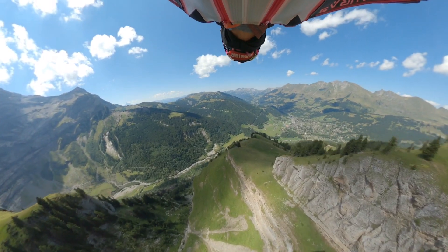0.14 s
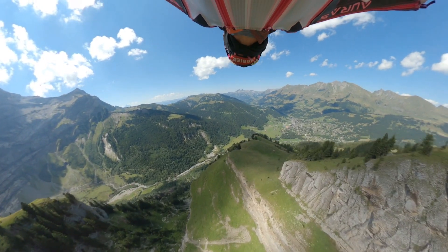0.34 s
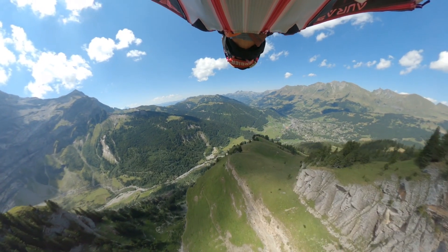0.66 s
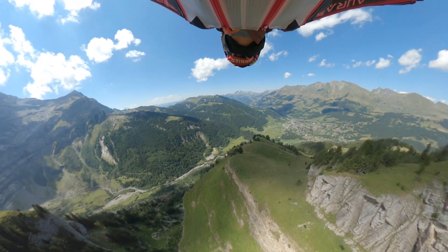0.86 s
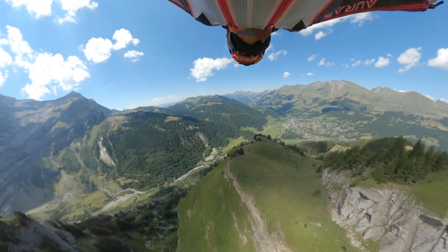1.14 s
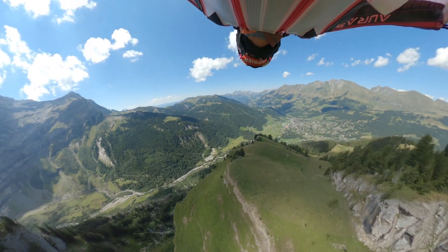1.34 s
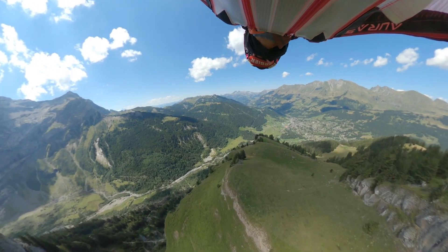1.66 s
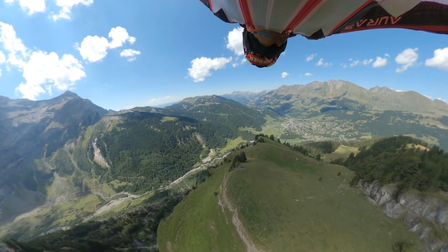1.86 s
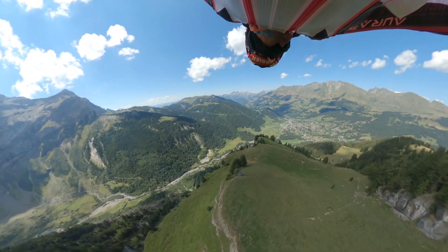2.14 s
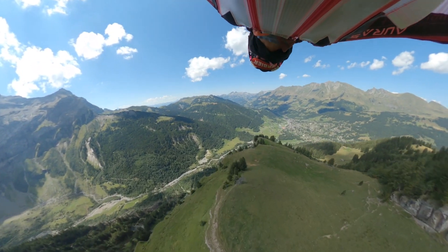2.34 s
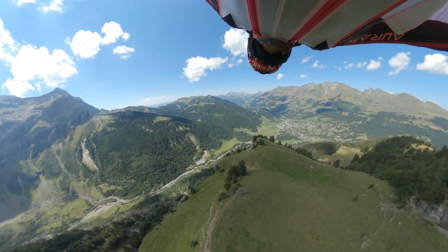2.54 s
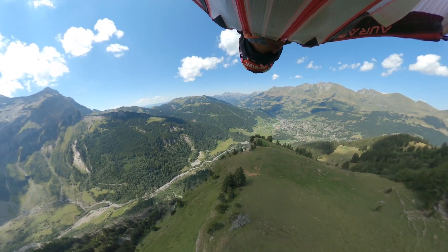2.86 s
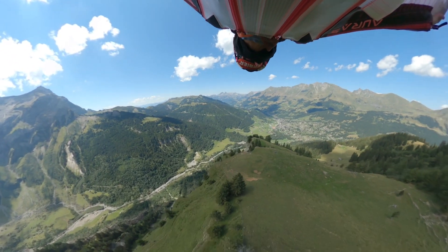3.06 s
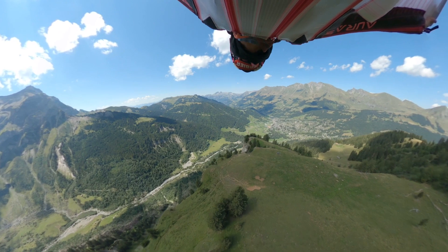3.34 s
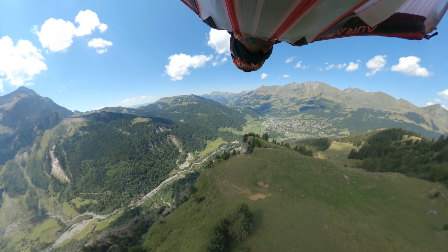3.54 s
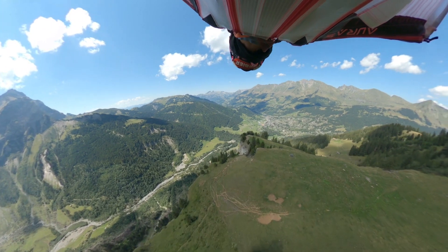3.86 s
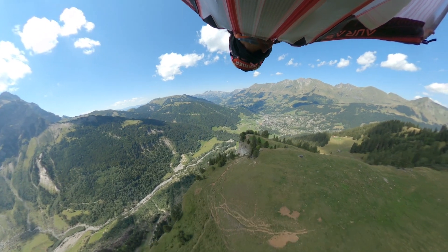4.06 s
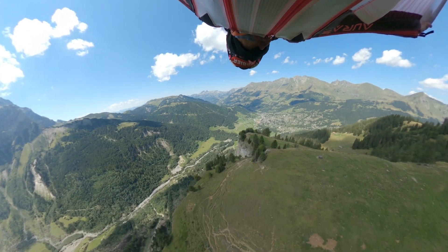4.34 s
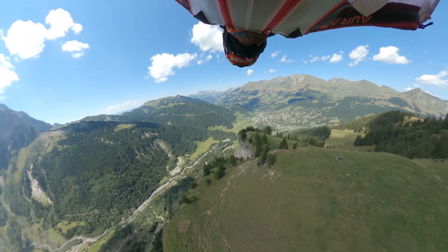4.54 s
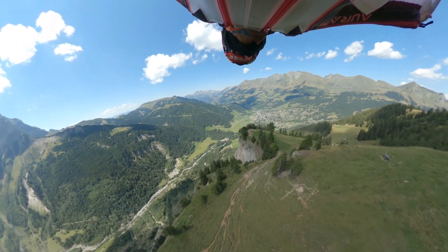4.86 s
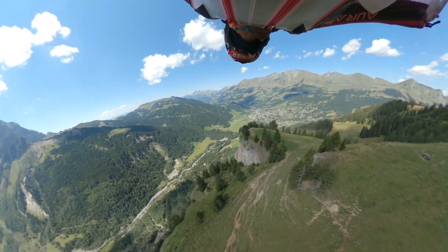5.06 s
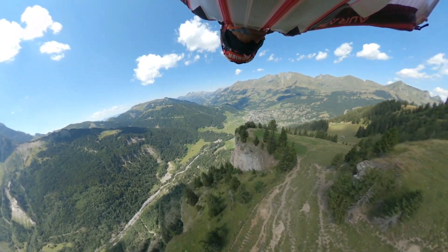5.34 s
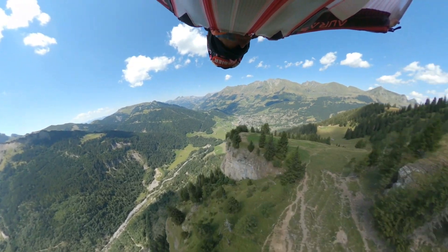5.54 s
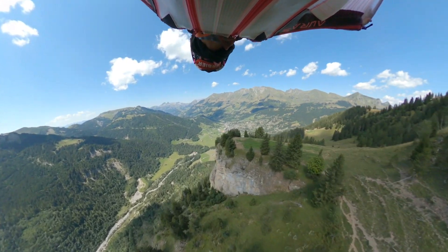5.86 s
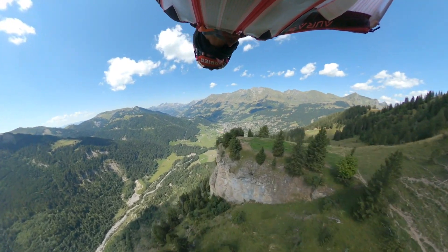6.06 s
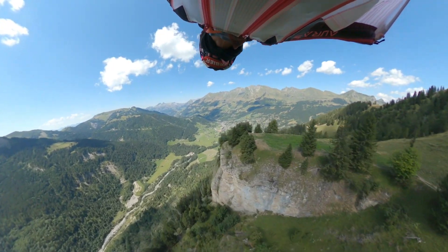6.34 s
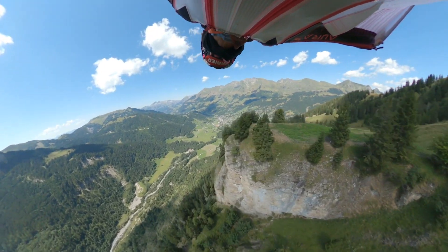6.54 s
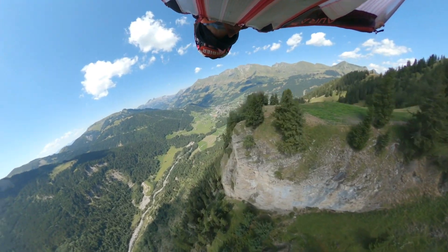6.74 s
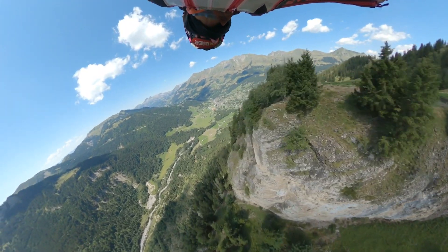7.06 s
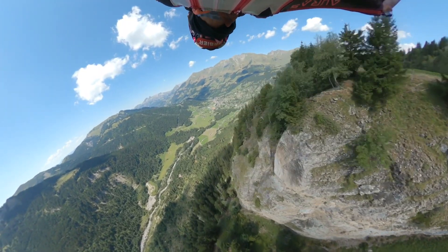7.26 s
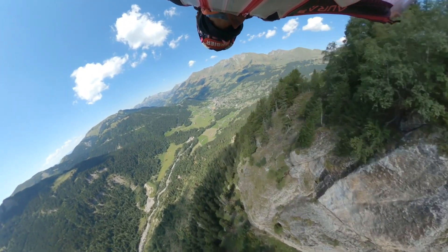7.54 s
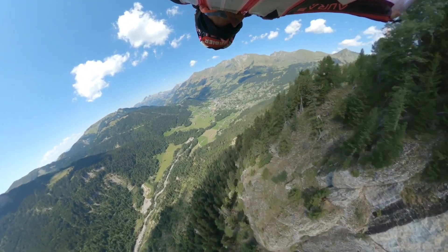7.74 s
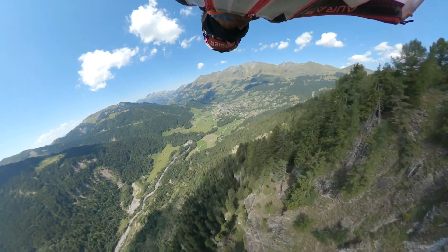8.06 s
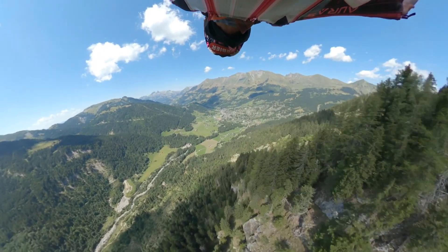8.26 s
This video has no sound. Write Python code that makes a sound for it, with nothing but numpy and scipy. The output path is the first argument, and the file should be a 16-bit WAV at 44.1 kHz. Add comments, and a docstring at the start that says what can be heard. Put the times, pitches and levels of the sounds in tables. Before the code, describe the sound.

Fast wind roars and buffets against a microphone on a wingsuit flyer, with deep thumps, fluttering slaps and a steady hiss over mountain slopes.

```python
"""Open sky, in fast wingsuit flight: the airstream beats on a body-mounted camera and its one microphone.
Deep noise swells into thumps as large eddies hit the housing; band noise and a swooping tone make its wake.
Midrange noise puffs and tears in short slaps of rough air, and fine turbulence hisses in the microphone port.
A thin, very high noise sizzles once over a faint sheen; a limiter eases the peaks."""
import sys
import numpy as np
from scipy import signal
from scipy.fft import rfft, irfft
from scipy.io import wavfile
from scipy.ndimage import uniform_filter1d, minimum_filter1d

SR = 44100
rng = np.random.default_rng(int(sys.argv[2]) if len(sys.argv) > 2 else 0)


def log_audio(samples):
    """Write samples as a 16-bit WAV file to the path given in sys.argv[1]."""
    # one column per channel
    frames = np.atleast_2d(samples).T
    # limit to full scale, then quantise
    limited = np.clip(frames, -1, 1)
    pcm = np.round(limited * 32767).astype(np.int16)
    wavfile.write(sys.argv[1], SR, pcm)


N = 370440  # 8.4 s
TIME = np.arange(N) / SR
FREQS = np.maximum(np.fft.rfftfreq(N, 1 / SR), 1)  # kept above zero for the logarithm


def undb(db):
    """Decibels to gain."""
    return 10 ** (np.asarray(db) / 20)


def unit(x):
    """Scale to rms 1."""
    return x / np.sqrt(np.mean(x ** 2))


def curve(rows):
    """Join rows of (time_s, value) by straight lines."""
    return np.interp(TIME, *np.transpose(rows))


def colour(points):
    """Gain at each frequency from (freq_hz, level_db) points, joined over log frequency."""
    hz, db = np.transpose(points)
    return undb(np.interp(np.log(FREQS), np.log(hz), db))


def noise(gain):
    """Fresh noise of rms 1 with the given gain at each frequency."""
    spectrum = rfft(rng.standard_normal(N))
    return unit(irfft(spectrum * gain, N))


def walk(rate_hz):
    """Slow random drift of rms 1, changing up to about rate_hz times a second."""
    return noise(1 / (1 + (FREQS / rate_hz) ** 4))


def sustain(x, span_s):
    """Even out the power over span_s: a steady stream keeps feeding its eddies."""
    power = uniform_filter1d(x ** 2, max(int(span_s * SR), 2))
    return x / np.sqrt(power + 1e-9)


# Large eddies that thump the housing; the shortest stay below their level.
# Columns: middle_s, length_s, level_db
THUMPS = [(0.051, .14, -20.5), (0.382, 0.11, -20), (1.899, 0.24, -21), (2.119, 0.19, -23),
          (2.376, 0.13, -19), (2.773, .09, -24), (3.03, .08, -23), (3.394, 0.06, -24), (3.87, 0.15, -26.5),
          (4.24, 0.14, -23), (4.939, 0.082, -21.5), (5.398, 0.15, -16), (5.57, 0.077, -17.5),
          (5.762, .08, -17.5), (5.884, .08, -18.5), (6.113, .08, -25), (6.852, .1, -22), (7.038, .12, -22),
          (7.196, 0.08, -16), (7.387, 0.06, -20), (7.601, .08, -18.5), (8.001, .09, -23),
          (8.316, 0.067, -17.5)]
THUMP_EDGE_S = 0.079  # full rise or fall time


def thumps():
    """Summed power of the large eddies: each rises, holds if long enough, and falls."""
    power = np.zeros(N)
    for middle, length, db in THUMPS:
        inside_s = length / 2 - np.abs(TIME - middle)
        envelope = np.clip(inside_s / THUMP_EDGE_S + .5, 0, 1)
        power += (undb(db) * envelope) ** 2
    return power


# Deep tone balance of the rumble. Columns: freq_hz, level_db (relative)
BUFFET_COLOUR = [(10, -8), (22, -5), (37, -.5), (48, -2.5), (64, -1), (80, -6.5), (100, -9), (250, -35.5),
                 (800, -83.5), (8000, -130)]
RUMBLE_DB, REFERENCE_HISS_DB = -27.5, -34.5  # rumble between thumps when the stream is at this hiss level


def buffet(thump_power, lumps_db=2, slack_gain=0.88):
    """Large eddies press on the diaphragm: a lumpy rumble, heavier in thumps and where the stream slackens."""
    slack_db = REFERENCE_HISS_DB - curve(STREAM_LEVEL)
    steady = undb(RUMBLE_DB + slack_gain * slack_db + lumps_db * walk(34))
    rumble = sustain(noise(colour(BUFFET_COLOUR)), 0.055)
    return rumble * np.sqrt(steady ** 2 + thump_power)


# Strength of the wake behind the housing. Columns: time_s, level_db (before trim)
WAKE_STRENGTH = [(0.0, -17.5), (0.28, -16.5), (.42, -17), (0.56, -13), (.88, -16), (1.0, -15.5),
                 (1.1, -16.5), (1.36, -14), (1.47, -15.5), (1.57, -13), (1.69, -16), (1.92, -15),
                 (2.32, -17.5), (2.53, -13.5), (2.98, -13.5), (3.15, -15), (3.35, -14.5), (3.42, -17),
                 (3.52, -13.5), (3.73, -16.5), (3.87, -15), (4.03, -15), (4.13, -15.5), (4.38, -14.5),
                 (4.52, -17), (4.72, -13), (4.89, -19), (5.06, -13.5), (5.18, -18), (5.38, -16),
                 (5.82, -14), (6.11, -20.5), (6.26, -17.5), (6.58, -19.5), (7.02, -14.5), (7.14, -18.5),
                 (7.24, -17), (7.49, -14), (7.76, -15), (8.1, -16.5), (8.19, -15.5), (8.4, -19.5)]
# Rate at which vortices leave the housing, before random wander. Columns: time_s, pitch_hz
SHEDDING_PITCH = [(0, 125.9), (.32, 99.25), (.57, 128), (.7, 88), (.85, 106.9), (1.02, 134), (1.15, 97.7),
                  (1.3, 122.5), (1.48, 84), (1.6, 132.3), (1.77, 88), (1.9, 128), (2.38, 77.8),
                  (2.53, 109.7), (2.66, 106), (2.82, 160.4), (2.96, 79.2), (3.5, 131), (3.62, 84.6),
                  (3.84, 150.1), (4.16, 112), (4.28, 162.7), (4.45, 123.6), (4.7, 112.5), (4.86, 84.5),
                  (5.08, 92.2), (5.4, 125.1), (5.84, 108.8), (5.98, 145.8), (6.45, 86.1), (6.92, 96),
                  (7.1, 114.4), (7.35, 83.2), (7.53, 126.6), (7.76, 137.2), (7.92, 91.4), (8.4, 100)]
# Tone balance of the wake's turbulence. Columns: freq_hz, level_db (relative)
WAKE_COLOUR = [(35, -18.5), (76, -0.6), (110, 0), (135, 0.3), (165, -1.5), (215, -3.5), (255, -8.5),
               (300, -10.5), (450, -23.5), (1000, -36), (3000, -77), (10000, -120)]


def wake(slap_power, wander=.06, jitter=.12, swell_db=3, shed_db=-5.0, lock_gain=0.63,
         throb_db=1.0, stir_db=-1.5, trim_db=-2.0):
    """Vortices peel off at a swooping rate and stand out in a strong wake; slaps stir the wake up."""
    hz = curve(SHEDDING_PITCH) * np.exp(wander * walk(11.08) + jitter * walk(72.1))
    strength_db = curve(WAKE_STRENGTH)
    drone = np.sin(2 * np.pi * np.cumsum(hz) / SR)
    vortices = drone * undb(swell_db * walk(13) + lock_gain * strength_db)
    churn = noise(colour(WAKE_COLOUR)) + undb(shed_db) * unit(vortices)
    steady = undb(strength_db + trim_db + throb_db * walk(17))
    stirred_power = undb(stir_db) ** 2 * slap_power
    return sustain(churn, .08) * np.sqrt(steady ** 2 + stirred_power)


# Pockets of rough air that slap the port. Columns: start_s, length_s, level_db (before trim)
SLAPS = [(0.655, 0.045, -27.5), (0.828, 0.023, -24), (1.036, .06, -29.5), (1.265, 0.083, -28),
         (1.674, 0.071, -29), (1.835, .08, -26), (2.123, 0.046, -28), (2.354, 0.042, -25),
         (2.453, 0.021, -28.5), (2.506, 0.035, -28.5), (2.603, .028, -28), (2.782, 0.11, -28.5),
         (2.924, .037, -25), (3.231, 0.016, -21.5), (3.307, .06, -26.5), (3.473, 0.037, -24),
         (3.58, 0.065, -29), (4.371, .03, -25.5), (4.654, 0.051, -27.5), (4.964, .05, -30),
         (5.251, .045, -26.5), (5.346, .028, -21.5), (5.404, 0.074, -23.5), (5.538, 0.036, -23),
         (5.721, .041, -19.3), (5.829, 0.036, -20.5), (5.887, 0.039, -24.5), (6.021, .03, -25),
         (6.335, .062, -28.5), (6.706, 0.063, -28), (7.005, .062, -23), (7.085, .06, -21.5),
         (7.174, 0.058, -23), (7.254, 0.083, -30.5), (7.752, .04, -33.5), (7.803, 0.03, -28),
         (7.866, .027, -25.5), (8.03, 0.021, -26.5), (8.254, .038, -25.5)]
SLAP_ATTACK_S, SLAP_DECAY_S = .005, .009


def slaps():
    """Summed power of the pockets of rough air: each hits abruptly, holds and dies away."""
    power = np.zeros(N)
    for start, length, db in SLAPS:
        age = TIME - start
        attack = np.clip(age / SLAP_ATTACK_S, 0, 1)
        decay = np.exp(-np.maximum(age - length, 0) / SLAP_DECAY_S)
        power += (undb(db) * attack * decay) ** 2
    return power


# Level of the steady roar, which thins out in the lulls between slaps. Columns: time_s, level_db
ROAR_LEVEL = [(0.0, -29.5), (.2, -30), (1.1, -31), (1.5, -30), (2.25, -30.5), (2.9, -33.5), (3.16, -31.5),
              (3.4, -32.5), (3.75, -32.5), (4.0, -30), (4.72, -32), (4.9, -32), (5.15, -30), (5.45, -27.5),
              (5.62, -33), (5.85, -30), (6.15, -32), (6.55, -31), (6.95, -29.5), (7.12, -27.5),
              (7.5, -32.5), (8.4, -30.5)]
# Tone balance of the puffs. Columns: freq_hz, level_db (relative)
GUST_COLOUR = [(120, -21), (230, -2.5), (320, 1), (450, -1.5), (680, -7), (950, -21), (1500, -27.5),
               (4000, -63.5), (12000, -100)]
# Duller tone balance of the tears. Columns: freq_hz, level_db (relative)
SLAP_COLOUR = [(110, -10), (220, 4), (340, 1), (480, -4), (700, -14), (950, -25.5), (1500, -31),
               (4000, -67.5), (12000, -105)]


def gusts(slap_power, flutter_db=0.7, surge_db=1.1, slap_trim_db=-1.33):
    """Rough air breaks at the port in quick, uneven puffs; each slap adds a short, duller tear."""
    puffs = sustain(noise(colour(GUST_COLOUR)) * undb(flutter_db * walk(45)), .08)
    roar = puffs * undb(curve(ROAR_LEVEL) + surge_db * walk(37))
    tear = sustain(noise(colour(SLAP_COLOUR)), .025)
    return roar + tear * undb(slap_trim_db) * np.sqrt(slap_power)


# Speed of the smooth stream over the port, as its hiss level. Columns: time_s, level_db (before trim)
STREAM_LEVEL = [(0.0, -39), (0.36, -38), (1.08, -37.5), (1.26, -36.5), (1.55, -37), (2.1, -37.5),
                (2.48, -36.5), (2.75, -38), (3.55, -37.5), (4.5, -38.5), (5.35, -37.5), (6.0, -40),
                (6.36, -39.5), (6.6, -39.5), (7.28, -40.5), (7.47, -39), (7.8, -39.5), (8.0, -40),
                (8.25, -38.5), (8.4, -38)]
# Lift of the midrange rush over the rest of the hiss. Columns: time_s, lift_db
RUSH_LIFT = [(0.0, 1), (.75, -0.5), (1.05, -1), (1.5, -1), (1.85, .5), (2.08, -0.5), (2.7, .8), (3.1, -.5),
             (3.85, .6), (4.4, 0.7), (4.78, 2.3), (5.0, 0), (5.42, 0.7), (6.18, 0.3), (6.5, 1.5), (6.7, -1),
             (7.15, 2.5), (7.65, -1), (8.4, 1.5)]
# Tone balance of the hiss before the port's resonance. Columns: freq_hz, level_db (relative)
STREAM_COLOUR = [(300, -16.5), (800, 8), (1150, 4.5), (1550, 3), (2000, -0.7), (2600, -1.5), (3300, -4),
                 (4300, -6.5), (5200, -11), (6500, -19), (8000, -27), (9300, -34), (12300, -47),
                 (15000, -68.5)]


def stream(pressure, port_hz=4020, port_width_hz=450, port_db=3.0, bright_hz=4600, brighten=0.44,
           ripple_db=0.5, flicker_db=0.24, trim_db=0.43, rush_hz=1750):
    """Fine turbulence hisses through the port's resonance, brightens with speed and ripples with each eddy."""
    port = undb(port_db / (1 + (2 * (FREQS - port_hz) / port_width_hz) ** 2))
    hiss = noise(colour(STREAM_COLOUR) * port)
    speed_db = curve(STREAM_LEVEL)
    # split into fine treble, midrange rush and what lies between
    spectrum = rfft(hiss)
    fine = irfft(spectrum / (1 + (bright_hz / FREQS) ** 10), N)
    rush = irfft(spectrum / (1 + (FREQS / rush_hz) ** 10), N)
    middle = hiss - fine - rush
    # small eddies grow faster with speed than large ones; the rush swells on its own
    bright = fine * undb(brighten * (speed_db - speed_db.mean()))
    mix = middle + bright + rush * undb(curve(RUSH_LIFT))
    return mix * undb(speed_db + trim_db + ripple_db * unit(pressure) + flicker_db * walk(12))


# Very high tone balance of the sizzle. Columns: freq_hz, level_db (relative)
SIZZLE_COLOUR = [(10300, -52), (11100, -14), (11500, -4), (12100, 2), (12900, -5), (14000, -10),
                 (15700, -17)]
SIZZLE_START_S, SIZZLE_STOP_S = 6.062, 6.418
SIZZLE_ATTACK_S, SIZZLE_DECAY_S, SIZZLE_RELEASE_S = .003, 0.029, .008  # exponential time constants
SIZZLE_FLARE_DB, SIZZLE_HOLD_DB, SIZZLE_SWELL_DB_PER_S = -51, -74.5, 23
SIZZLE_LEAD_DB, SIZZLE_LEAD_S = -76, .25  # a faint sputter builds before the flare


def sizzle(grain_db=1.0, sputter_db=6):
    """A grainy hiss, perhaps air squeezing through a narrow gap: it sputters, flares, lingers and stops."""
    early = np.minimum(TIME - SIZZLE_START_S, 0)
    late = np.maximum(TIME - SIZZLE_STOP_S, 0)
    age = np.clip(TIME, SIZZLE_START_S, SIZZLE_STOP_S) - SIZZLE_START_S
    flare = undb(SIZZLE_FLARE_DB) * np.exp(-age / SIZZLE_DECAY_S)
    hold = undb(SIZZLE_HOLD_DB + SIZZLE_SWELL_DB_PER_S * age)
    flow = (flare + hold) * np.exp(early / SIZZLE_ATTACK_S)
    sputter = unit(undb(sputter_db * walk(110)))
    lead = undb(SIZZLE_LEAD_DB) * np.exp(early / SIZZLE_LEAD_S) * sputter
    envelope = np.maximum(lead, flow) * np.exp(-late / SIZZLE_RELEASE_S)
    grains = unit(noise(colour(SIZZLE_COLOUR)) * undb(grain_db * walk(260)))
    return grains * envelope


# Level of the very top of the hiss. Columns: time_s, level_db
AIR_LEVEL = [(0.12, -79), (1.19, -77), (1.39, -75.5), (5.36, -75.5), (5.9, -76.5), (6.5, -82),
             (7.32, -83.5), (8.3, -76)]
# Tone balance of the sheen. Columns: freq_hz, level_db (relative)
AIR_COLOUR = [(4000, -17.5), (8000, -10), (10000, 3.5), (11500, 2), (12300, 0.5), (13300, -9),
              (14500, -23.5), (15700, -35)]


def air(grain_db=1.0):
    """The finest eddies add a faint, grainy sheen that fades as the flight path banks, then returns."""
    sheen = unit(noise(colour(AIR_COLOUR)) * undb(grain_db * walk(150)))
    return sheen * undb(curve(AIR_LEVEL))


def scene():
    """All the air noise sums at the one microphone; open sky returns no echo."""
    slap_power = slaps()
    pressure = buffet(thumps()) + wake(slap_power)
    mix = pressure + gusts(slap_power) + stream(pressure) + sizzle() + air()
    return mix[None]  # one channel


def limiter(x, knee_db=-5.5, squeeze=0.85, hold_s=0.008):
    """Look ahead and ease the gain down around each peak that passes the knee."""
    span = max(int(hold_s * SR), 2)
    gain = np.minimum(1, undb(knee_db) / (np.abs(x) + 1e-9)) ** squeeze
    return x * uniform_filter1d(minimum_filter1d(gain, span), span)


TOP_HZ = 15700  # the treble stops here


def record(dry):
    """The camera limits the strongest buffets and cuts the top; 2 ms fades open and close the sound."""
    top = signal.ellip(8, .2, 70, TOP_HZ, fs=SR, output="sos")
    edges = np.minimum(np.minimum(TIME, TIME[-1] - TIME) / .002, 1)
    return signal.sosfilt(top, limiter(dry) * edges)


dry = scene()
out = record(dry)
log_audio(out)
```